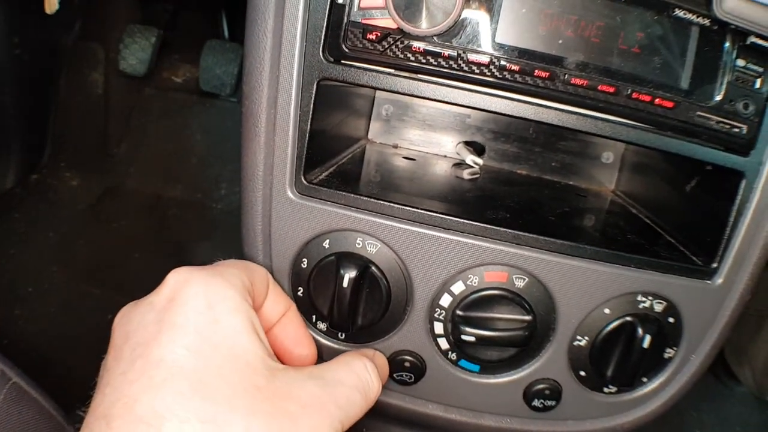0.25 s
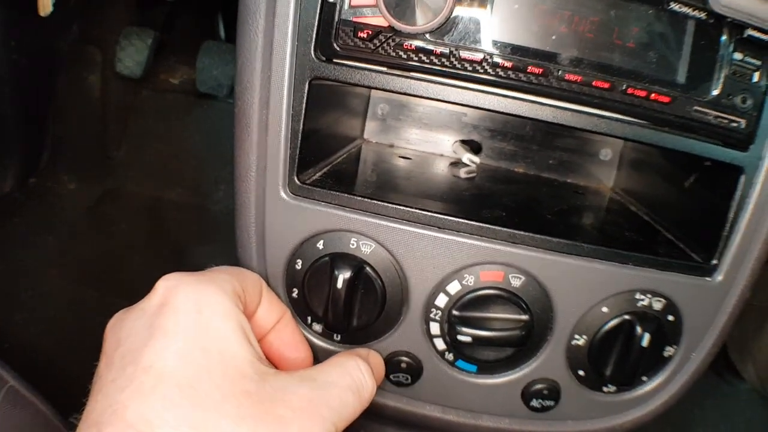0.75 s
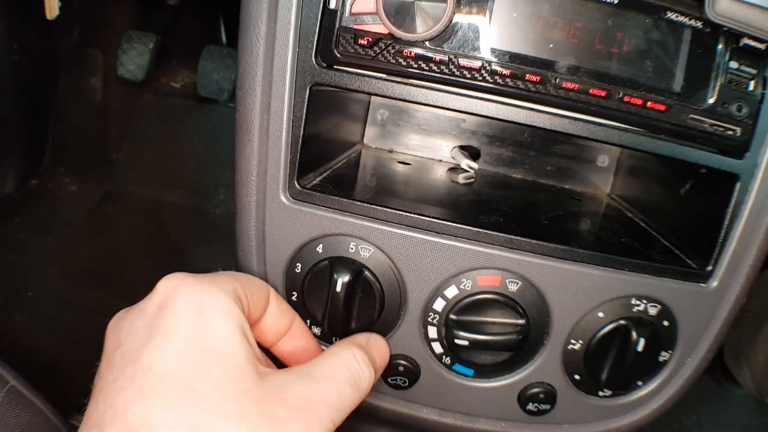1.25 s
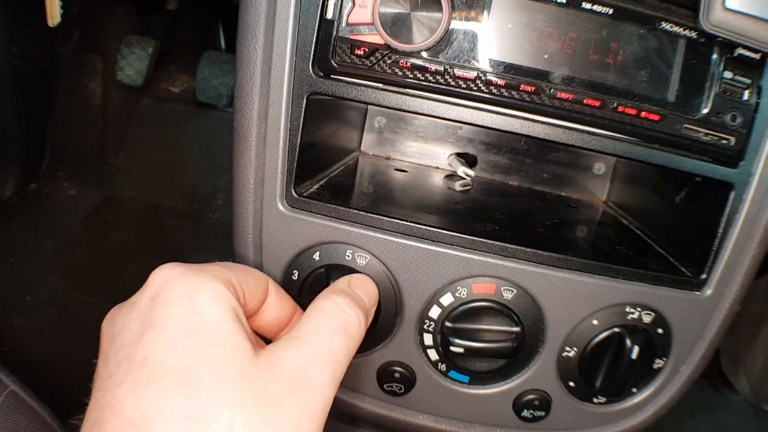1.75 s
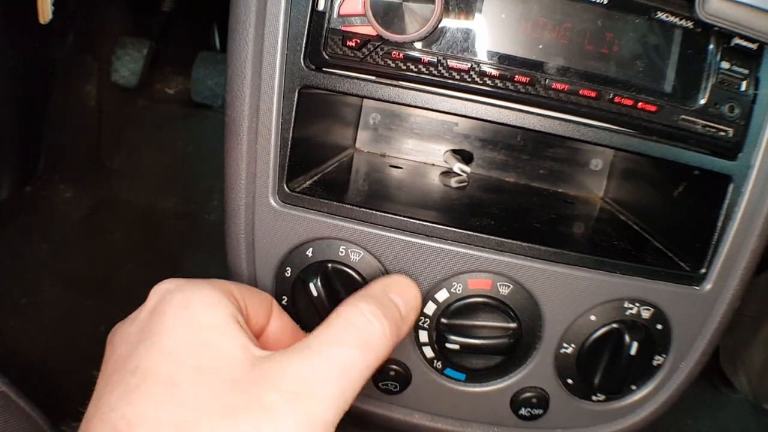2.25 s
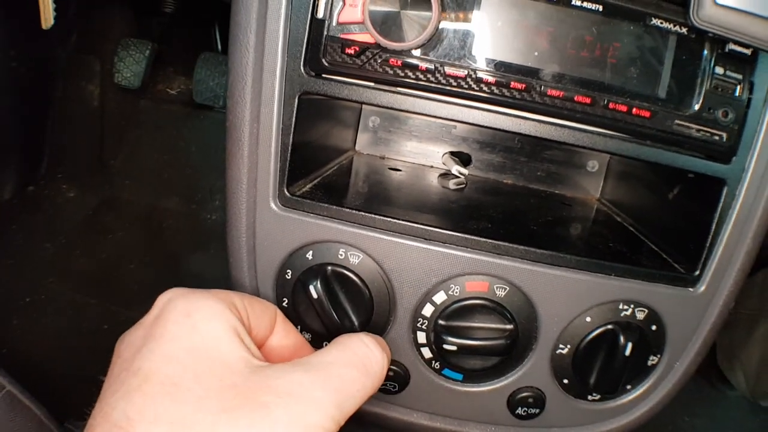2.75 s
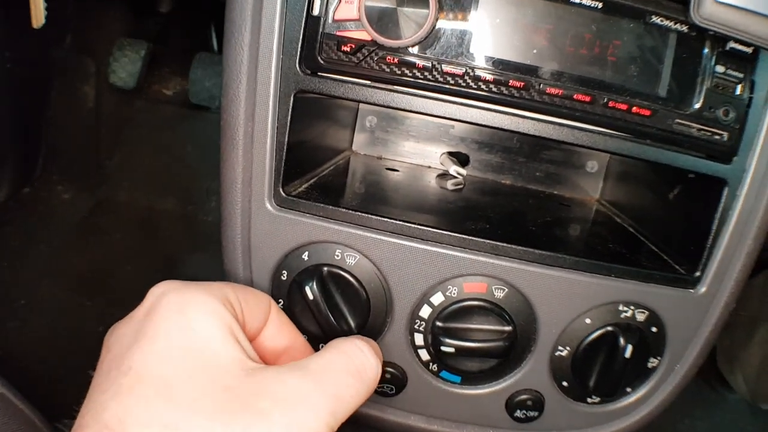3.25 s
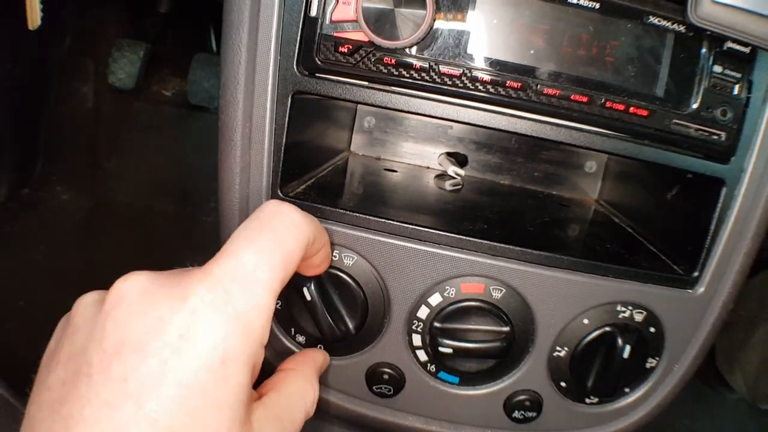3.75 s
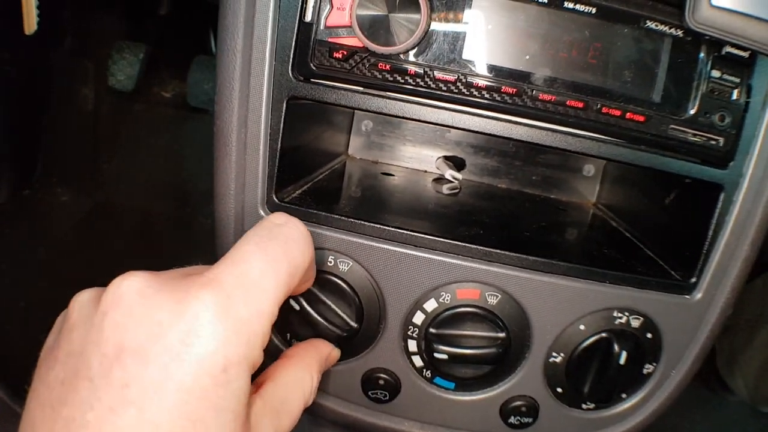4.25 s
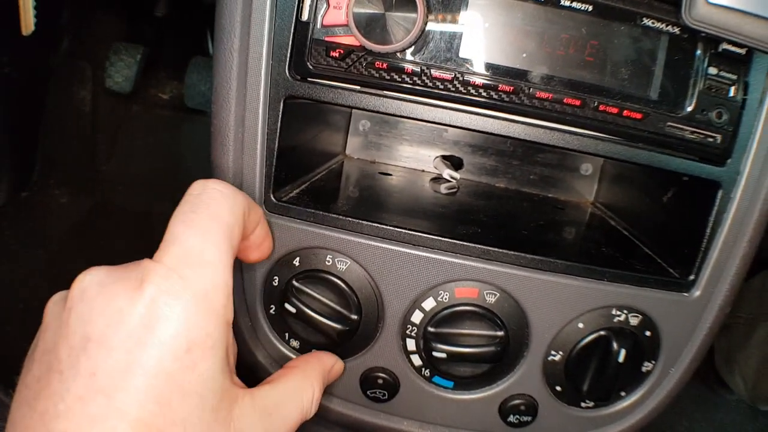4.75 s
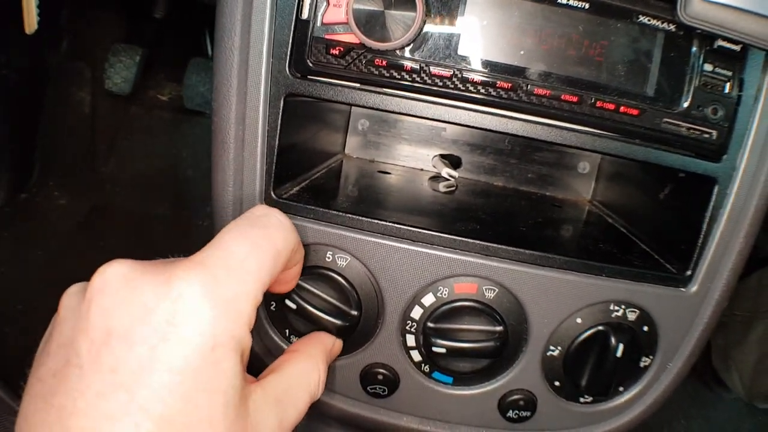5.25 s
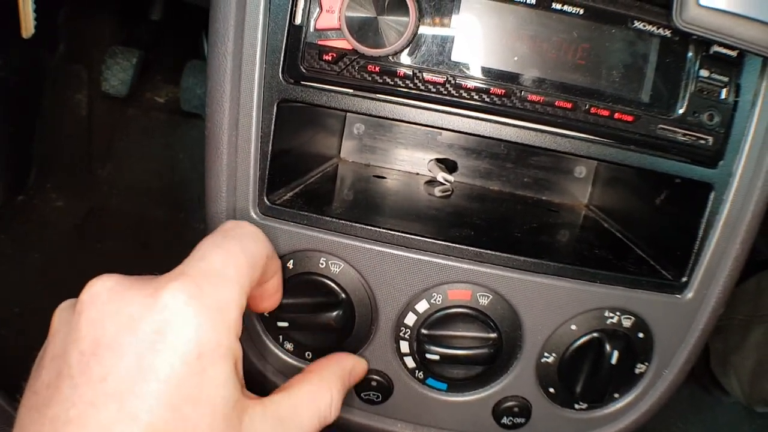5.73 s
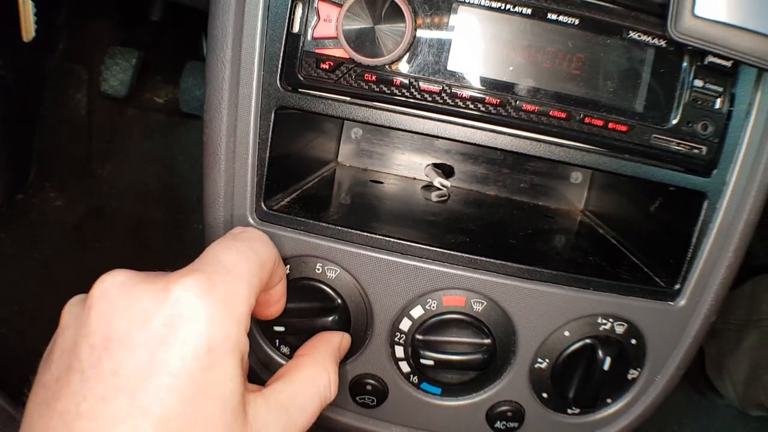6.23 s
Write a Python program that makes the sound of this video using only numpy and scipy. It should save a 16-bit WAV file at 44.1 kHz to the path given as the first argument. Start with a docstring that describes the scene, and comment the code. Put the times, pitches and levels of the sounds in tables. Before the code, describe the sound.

Inside a car, a close microphone sits in the jet of a blower at full speed: broad rushing air, low rumble and irregular wind puffs. After about two seconds a plastic knob clicks sharply, the wind collapses, and the fan's rush slides down and fades with a faint motor groan. In the quiet, fingers brush the knob; a softer click follows, then a loud, bright one.

```python
"""In a car's cabin, a microphone held by the dashboard stands in the jet of the blower at full speed.
Shaped noise makes the rushing air; random pressure swings and noise make the buffeting of the jet.
The fan knob clicks to off and the wheel coasts down, its whine vanishing and its motor groaning once.
In the quiet, fingers brush the knob as grainy noise, take a new grip and turn it two more detents:
bursts of noise for the plastic, decaying sines for the dashboard, over hiss, faint hum and low boom."""
import sys
import numpy as np
from scipy import signal
from scipy.fft import rfft, irfft
from scipy.io import wavfile
from scipy.ndimage import uniform_filter1d

SR = 44100
rng = np.random.default_rng(int(sys.argv[2]) if len(sys.argv) > 2 else 0)


def output_pcm(signal):
    """Save a mono or channel-first signal as 16-bit PCM at the path in sys.argv[1].

    Samples are clipped to [-1, 1] before scaling.
    """
    pcm = np.clip(np.atleast_2d(signal).T, -1, 1) * 32767
    wavfile.write(sys.argv[1], SR, np.round(pcm).astype(np.int16))


N = 286020

# In all tables half_s is the time from the centre to 1/e; left_right_db is left over right.
# Air rushing from the vents at full speed: pitch_hz, relative_db_per_hz
RUSH_COLOUR = [(40, -14.5), (150, -0.5), (400, -5), (650, -10), (950, -15.5), (1700, -20), (2600, -25.5),
               (4000, -30.5), (5200, -33.5), (7000, -38), (9000, -40), (12000, -38.5), (14000, -44),
               (16000, -51.5)]
# Fixed resonances of the ducts: pitch_hz, width_hz, lift_db, extra_lift_db_per_tenfold_slowing
DUCT_RESONANCES = [(460, 120, 8, 14), (660, 120, 7, 14), (1275, 120, 11, 13), (1400, 110, 7, 8),
                   (1950, 130, 4, 0), (2270, 160, 10, 0), (2930, 180, 6, 0), (3480, 300, 3, 0),
                   (4400, 130, 4, 0), (4820, 220, 6, 0), (5150, 130, 3, 0)]
# Balance of the rushing air: pitch_hz, left_right_db
VENT_BALANCE = [(200, 6), (450, -3), (900, -0.5), (1400, -1), (2300, 0.5), (5000, -0.5), (12000, 0)]
# Low rumble of the jet on the microphone: pitch_hz, relative_db_per_hz
RUMBLE_COLOUR = [(15, -18), (30, -12), (55, 2), (85, -1.5), (120, -1), (140, -1.5), (160, -7), (190, -14.5),
                 (240, -13), (400, -23), (1200, -74.5)]
# Sharp puffs on the microphone's ports: pitch_hz, relative_db_per_hz
PUFF_COLOUR = [(120, -18.5), (300, 3), (600, -8), (1000, -5), (1700, -12.5), (2500, -25), (4000, -32.5),
               (8000, -55)]
# The jet swings onto the microphone: centre_s, half_s, rumble_lift_db, small_eddy_lift_db
JET_GUSTS = [(0.01, 0.017, 9, 13.5), (0.172, 0.021, 5.5, -3), (0.777, 0.033, 5.5, 14.5),
             (1.465, 0.02, 2, 13.5), (1.618, 0.026, 8.5, 7.5), (1.731, 0.034, 15.5, 20),
             (1.872, .03, 9.5, 7.5), (1.981, 0.016, 7, 1), (2.095, .028, -2.5, 11), (2.193, 0.018, 3.5, -6)]
# Eddies that stand out, from low thuds to short, higher spits:
# centre_s, level_db, pitch_hz, half_s, left_right_db
STANDOUT_EDDIES = [(0.242, -16, 65, 0.0077, 1), (0.422, -17.5, 550, .0013, -13.5),
                   (0.533, -15, 190, 0.0022, 2), (0.758, -13.5, 700, 0.0017, -2),
                   (0.761, -9, 375, 0.0033, -3), (0.878, -7, 110, 0.0032, -1),
                   (1.134, -17.5, 83, 0.0078, 1), (1.451, -22.5, 696, 0.0011, -10),
                   (1.559, -20.5, 296, 0.0057, 3), (1.719, -14, 400, 0.0036, 6.5),
                   (1.725, -8.5, 134, 0.0062, -1), (1.766, -13, 76.5, 0.016, 2),
                   (1.988, -14.5, 282, 0.0042, 3.5), (2.077, -10.5, 300, 0.0026, -4.5),
                   (2.137, -27, 680, 0.0014, -19.5), (2.221, -27.5, 555, 0.0016, -20),
                   (2.281, -26, 596, 0.00093, -7), (2.425, -29.5, 144, 0.0061, -2)]
# Knob snaps over a detent, then seats: start_s, snap_level_db, seating_delay_s, seating_level_db,
# seating_brightness_hz, seating_push_db (push on the dashboard)
KNOB_DETENTS = [(2.0635, -8, 0.0026, -8, 13100, 4.5), (4.394, -15.5, 0.0071, -23, 2490, -5.5),
                (5.5214, -5.5, .0035, 1, 15000, -4)]
# Knob knocks lightly in its play: start_s, level_db, brightness_hz, push_db
KNOB_KNOCKS = [(3.843, -29, 9230, -38), (3.924, -34.5, 1500, -9.5), (4.499, -45.5, 704, 6),
               (5.3059, -32, 907, -1), (5.4863, -31, 9900, -5.5), (5.6092, -30, 9000, 11.5)]
# Colour of the plastic's snap: pitch_hz, relative_db_per_hz
SNAP_COLOUR = [(60, -27), (200, -12.5), (400, -0.5), (700, -14), (1500, -1), (2400, 0), (3700, -7),
               (5000, 1), (7500, -15), (9500, -3), (11200, 0), (13500, -5.5), (16000, -15)]
# Balance of the snap: pitch_hz, left_right_db
SNAP_BALANCE = [(500, -8), (2000, 0), (5000, -0.5), (9500, 1), (13000, 0)]
# The dashboard's ringing modes: pitch_hz, relative_level_db, t60_s
DASH_MODES = [(79.4, -27, 0.36), (137.7, -29.5, 0.36), (282.4, -31.5, 0.18), (540, -14, 0.1),
              (627, -25.5, 0.12), (842, -23, 0.068), (950, -26, 0.043), (1120, -27.5, .06),
              (1445, -34, 0.088), (1664, -29, 0.055), (1967, -27, 0.038), (2280, -47.5, 0.12),
              (3130, -32.5, 0.049)]
# The cabin's echo: pitch_hz, t60_s
CABIN_DECAY = [(100, .3), (600, 0.79), (2000, 0.31), (6000, 0.38), (14000, .12)]
# Fingers brushing and bumping the knob: start_s, level_db, centre_hz, width_octaves
FINGER_TOUCHES = [(3.524, -64.5, 1460, 1.7), (3.923, -55.5, 315, 0.4), (4.028, -69, 860, .8),
                  (4.202, -64.5, 1465, 5), (5.261, -67.5, 747, 0.81), (5.504, -51, 1510, 1.7),
                  (6.167, -66.5, 803, 1.4), (6.376, -60, 753, 1.9), (6.443, -57.5, 383, 0.33)]
# Background hiss: pitch_hz, relative_db_per_hz
HISS_COLOUR = [(100, -1.5), (200, -1), (400, 5), (550, -0.5), (1000, -4.5), (2500, -8.5), (4000, -6),
               (6000, -12), (7800, -20), (9500, -9.5), (12000, -0.5), (15700, -1.5)]
# Faint hum, before the background's swell: pitch_hz, level_db
HUM_TONES = [(274.3, -73), (343, -80.5), (411.5, -80), (823, -90.5)]
# The cabin's low boom: pitch_hz, relative_db_per_hz
CABIN_BOOM_COLOUR = [(15, -31.5), (26, -20.5), (36, -8.5), (50, -5.5), (70, 3.5), (100, -9.5), (160, -16.5),
                     (400, -46)]
# Slow swell of the background: time_s, gain_db
BACKGROUND_SWELL = [(0, -5.5), (3.15, -8), (3.4, -5.5), (4.1, -4.5), (4.7, -1.5), (6.49, 0)]
# The hand leans on the dashboard and the cabin booms: centre_s, level_db, half_s
HAND_LEANS = [(4.44, -52, 0.11), (4.87, -73, 0.047), (5.02, -61, 0.023), (5.307, -59.5, 0.027),
              (5.616, -45, 0.063), (6.45, -60, .04)]

OFF_S, COAST_S = 2.095, 0.79  # current is cut; time for the wheel's speed to fall to 1/e
WHINE_HZ, WHINE_DB = 2225, -53.5  # the blades' tone at full speed, before waver and flicker
GROAN_HZ, GROAN_DB = 666, -55  # motor's tone at full speed; its level at the housing's resonance
HOUSING_HZ, HOUSING_WIDTH_HZ = 221.6, 26
JET_HOLD_S, JET_LAW_DB = 0.138, 89  # jet outlasts the current; its fall per tenfold slowing
# Typical small fast eddy: rate, level, pitch, half length in cycles, left over right
SPITS_PER_S, SPIT_DB, SPIT_HZ, SPIT_CYCLES, SPIT_LEAN_DB = 10, -28, 897, 0.6, -5.5
RELEASE_HZ, RELEASE_PUSH_DB = 13000, -14  # brightness of the first snap; its push against the seating's
TOUCH_RISE_S = 0.011
HISS_DB, BOOM_DB = -64, -72.5  # before the background's swell
EDGE_HZ = 15830

TIME = np.arange(N) / SR
FRAME_S = np.arange(N // 256 + 5)[:, None] * 256 / SR
BIN_HZ = np.fft.rfftfreq(1024, 1 / SR)


def rush(level_db=-32.0, speed_law_db=42, stall_db=-85, patchy_db=4.0):
    """Turbulence slides down in pitch and level with the wheel, behind duct resonances that stay put."""
    a, b, c, d, patches = rng.standard_normal((5, len(FRAME_S), len(BIN_HZ)))
    likeness = [(200, .1), (1400, .1), (2400, 0.13), (5000, 0.12), (8000, 0.53), (12000, 1.0)]
    same = read(likeness, BIN_HZ)
    slowing = np.log10(speed(FRAME_S))
    field_db = read(RUSH_COLOUR, BIN_HZ / speed(FRAME_S))
    # the fall steepens as the flow in the ducts turns smooth
    field_db = field_db + speed_law_db * slowing + stall_db * slowing ** 2
    field_db = field_db + sum((lift - hold * slowing) / (1 + (2 * (BIN_HZ - hz) / width) ** 2)
                              for hz, width, lift, hold in DUCT_RESONANCES)
    patches = uniform_filter1d(patches, size=4, axis=0)
    patches = unit(uniform_filter1d(patches, size=16, axis=1))
    patches = patches / (1 + (BIN_HZ / 2500) ** 2)  # the high hiss is even
    gain = amp(field_db + patchy_db * patches) * pan(read(VENT_BALANCE, BIN_HZ))
    spectrum = pair(a + 1j * b, c + 1j * d, same) * gain
    air = signal.istft(spectrum.swapaxes(1, 2), nperseg=1024, noverlap=768)[1][:, :N]
    return amp(level_db) * air / air[:, TIME < OFF_S].std()


def speed(s):
    """Wheel speed as a share of full: friction slows it once the current is cut."""
    return np.exp(-np.maximum(s - OFF_S, 0) / COAST_S)


def buffeting(rumble_db=-31, rumble_lean_db=6.0, small_db=-39.5, small_lean_db=-1.0,
              per_cycle=0.26, spread_db=4.0, fall_db=-3,
              flutter_db=-42, flutter_lean_db=-5, burst_db=12.5,
              gust_share=0.4, small_law_db=110, wander_db=2):
    """The jet on the microphone: low rumble, a hail of small eddies and sharp puffs, moved by gusts."""
    strength_db = jet_db(TIME) + wander_db * wobble(size=1500)[0]
    surge_db = sum(lift * bump(s, half_s) for s, half_s, lift, _ in JET_GUSTS)
    gust_db = sum(lift * bump(s, half_s) for s, half_s, _, lift in JET_GUSTS)

    rumble = noise(RUMBLE_COLOUR, [(50, .15), (200, 0.15)])
    rumble = rumble * amp(rumble_db + strength_db + surge_db) * pan(rumble_lean_db)

    small = np.zeros((2, N))
    for hz in np.geomspace(165, 620, num=6):
        size = amp(spread_db * np.clip(rng.standard_normal((2, N)), -2, 2))
        size = size * rng.choice([-1, 1], (2, N))
        # smaller eddies come more often and push less
        hits = size * (rng.random((2, N)) < per_cycle * hz / SR)
        eddy = swirl(hz, 0.86 / hz, rng.uniform(0, 2 * np.pi))
        small += amp(fall_db * np.log2(hz)) * signal.oaconvolve(hits, eddy[None], "same")
    small = unit(small) * amp(small_db + strength_db + gust_db) * pan(small_lean_db)

    # turbulence is intermittent: puffs of a few milliseconds light up the whole midrange at once
    bursts = amp(burst_db * np.minimum(wobble(size=130), 2.4))
    puffs = unit(noise(PUFF_COLOUR, [(300, 0.12), (2000, 0.13)]) * bursts)
    puffs_db = flutter_db + gust_share * gust_db + small_law_db * np.log10(speed(TIME))
    return rumble + small + puffs * amp(puffs_db) * pan(flutter_lean_db)


def jet_db(s):
    """Strength of the jet: steady while the wheel runs, collapsing soon after it slows."""
    return JET_LAW_DB * np.log10(speed(s - JET_HOLD_S))


def swirl(hz, half_s, phase):
    """The pressure swing of one eddy passing a port, centred in a tenth of a second."""
    t = np.arange(-SR // 20, SR // 20) / SR
    return np.exp(-(t / half_s) ** 2) * np.cos(2 * np.pi * hz * t + phase)


def standout_eddies(port_lag=0.52, crackle_db=-12, crackle_s=0.0023):
    """Thuds and spits of air swing one port a little ahead of the other; high ones crackle the most."""
    out, breakup = np.zeros((2, 2, N))
    port_phase = port_lag * np.array([[-.5], [.5]])  # radians
    for s, db, hz, half_s, lean_db in STANDOUT_EDDIES + spits():
        gain = amp(db) * pan(lean_db)
        add(out, s - 1 / 20, gain * swirl(hz, half_s, port_phase))
        add(breakup, s - 1 / 20, gain * min(hz / 700, 1) * swirl(0, crackle_s, 0))
    return out + amp(crackle_db) * breakup * noise(PUFF_COLOUR, [(300, 0.64), (2000, .3)])


def spits(spread_db=4.0, octaves=0.33, count=40):
    """Small fast eddies at chance moments while the jet lasts, as rows like those of STANDOUT_EDDIES."""
    size, pitch, side = rng.standard_normal((count, 3)).T
    s = (np.arange(count) + rng.random(count)) / SPITS_PER_S
    hz = SPIT_HZ * 2 ** (octaves * pitch)
    level_db = SPIT_DB + spread_db * size
    lean_db = SPIT_LEAN_DB + spread_db * side
    rows = zip(s, level_db, hz, SPIT_CYCLES / hz, lean_db)
    return [row for row in rows if row[0] < OFF_S + JET_HOLD_S]


def wheel(waver=0.0018, flicker_db=3, rough=0.6):
    """The blades' whine dies as the wheel slows; the motor groans through the housing's resonance."""
    whine_hz = WHINE_HZ * speed(TIME) * (1 + waver * wobble(size=900))
    turns = np.cumsum(whine_hz, axis=1) / SR
    drive = speed(TIME) ** 10
    whine = drive * amp(WHINE_DB + flicker_db * wobble(size=1200)) * np.sin(2 * np.pi * turns)
    groan_hz = GROAN_HZ * speed(TIME)
    housing = 1 / (1 + (2 * (groan_hz - HOUSING_HZ) / HOUSING_WIDTH_HZ) ** 2)
    groan = amp(GROAN_DB) * housing * np.sin(2 * np.pi * np.cumsum(groan_hz) / SR)
    return whine + groan * (1 + rough * wobble(size=300))


def knob(snap_db=-9, snap_t60=0.0085, rattle_db=-11, rattle_t60=0.062, cabin_db=-33,
         dash_db=-4, build_cycles=0.96, attack_s=0.0004, push_hz=900):
    """Each blow is a snap of plastic, a short rattle and the cabin's echo; its push rings the dashboard."""
    t = np.arange(SR // 2) / SR
    hz = np.fft.rfftfreq(len(t), 1 / SR)
    same = read([(300, -0.81), (1500, -0.14), (5000, -0.34), (8000, 0.65), (12000, 0.82)], hz)
    snap_gain = amp(read(SNAP_COLOUR, hz)) * pan(read(SNAP_BALANCE, hz))[:, 0]
    decay = amp(-60 * t / snap_t60) + amp(rattle_db - 60 * t / rattle_t60)
    phases = rng.normal(0, 0.66, (len(DASH_MODES), 2, 1))
    modes = []
    for (f, db, t60), phase in zip(DASH_MODES, phases):
        # a mode takes a few cycles to build up, so the bass blooms late
        build = (1 - np.exp(-t * f / build_cycles)) ** 2
        modes.append(amp(db - 60 * t / t60) * build * np.sin(2 * np.pi * f * t + phase))
    out = np.zeros((2, N))
    for s, db, bright_hz, push_db in blows():
        direct, echo = rng.standard_normal((2, 2, len(t)))
        f, frame_s, z = signal.stft(echo, SR, nperseg=256)
        echo_gain = amp(cabin_db - 60 * frame_s / read(CABIN_DECAY, f)[:, None])
        echo = signal.istft(z * echo_gain, SR, nperseg=256)[1][:, :len(t)]
        burst = (direct * decay + echo) * (1 - np.exp(-t / attack_s))
        snap = irfft(pair(*rfft(burst), same) * snap_gain, len(t))
        snap = snap * (t < t[-1] / 2)
        # a slow push feeds only the low modes
        ring = sum(amp(push_db / (1 + (row[0] / push_hz) ** 4)) * mode
                   for row, mode in zip(DASH_MODES, modes))
        blow = amp(snap_db) * snap + amp(dash_db) * ring
        # a lower brightness takes off more treble
        treble_cut = signal.butter(2, min(bright_hz, SR * .45), fs=SR)
        add(out, s, amp(db) * signal.lfilter(*treble_cut, blow))
    return out


def blows():
    """Two blows per detent, one per knock, as rows of start_s, level_db, brightness_hz, push_db."""
    releases = [(s, db, RELEASE_HZ, push_db + RELEASE_PUSH_DB)
                for s, db, _, _, _, push_db in KNOB_DETENTS]
    seatings = [(s + delay_s, db, hz, push_db) for s, _, delay_s, db, hz, push_db in KNOB_DETENTS]
    return releases + seatings + KNOB_KNOCKS


def touches(grain_db=2.0, fade=0.67):
    """Skin sticks and slips on plastic: a grainy scuff that swells and fades."""
    t = np.arange(SR // 2) / SR
    hz = np.fft.rfftfreq(len(t), 1 / SR) + 1
    stroke = (t / TOUCH_RISE_S * np.exp(1 - t / TOUCH_RISE_S)) ** fade
    out = np.zeros((2, N))
    for s, db, centre_hz, octaves in FINGER_TOUCHES:
        a, b, grain = rng.standard_normal((3, len(t)))
        slips = pair(a, b, 0.44) * amp(grain_db * unit(uniform_filter1d(grain, size=80)))
        colour = (1 + (np.log2(hz / centre_hz) / octaves) ** 2 / 2) ** -1.5 / np.sqrt(hz)
        scuff = unit(irfft(rfft(slips) * colour, len(t)))
        add(out, s, amp(db) * stroke * scuff)
    return out


def background():
    """Hiss, faint hum and low boom creep up in the quiet; the boom swells under the leaning hand."""
    likeness = [(300, 0.64), (1500, 0.093), (4500, 0.069), (9000, .9), (12000, 0.97)]
    hiss = amp(HISS_DB) * noise(HISS_COLOUR, likeness)
    hum = sum(amp(db) * np.sqrt(2) * np.sin(2 * np.pi * (hz * TIME + rng.random()))
              for hz, db in HUM_TONES)
    boom = noise(CABIN_BOOM_COLOUR, [(60, 1.0), (300, 0.31)])
    leaning = sum(amp(db) * bump(s, half_s) for s, db, half_s in HAND_LEANS)
    return (hiss + hum + amp(BOOM_DB) * boom) * amp(curve(BACKGROUND_SWELL)) + leaning * boom


def noise(colour, likeness):
    """Steady stereo noise of rms 1 with a spectrum and a left-right likeness by frequency."""
    hz = np.fft.rfftfreq(N, 1 / SR)
    spectrum = pair(*rfft(rng.standard_normal((2, N))), read(likeness, hz))
    return unit(irfft(spectrum * amp(read(colour, hz)), N))


def wobble(size):
    """A smooth random curve of rms 1 for each channel, changing over size samples."""
    return unit(signal.oaconvolve(rng.standard_normal((2, N)), np.hanning(2 * size)[None], "same"))


def bump(s, half_s):
    """A smooth rise to 1 at time s and back."""
    return np.exp(-((TIME - s) / half_s) ** 2)


def pair(a, b, same):
    """Two channels of given likeness from two unrelated signals."""
    angle = np.arccos(np.clip(same, -1, 1)) / 2
    return np.array([np.cos(angle) * a + np.sin(angle) * b, np.cos(angle) * a - np.sin(angle) * b])


def pan(db):
    """Left and right gains for a level difference."""
    return amp(np.array([[db], [-db]]) / 2)


def add(mix, s, sound):
    """Mixes a stereo sound in at time s."""
    part = mix[:, max(round(s * SR), 0):][:, :sound.shape[1]]
    part += sound[:, :part.shape[1]]


def read(points, hz):
    """Reads a table by frequency on a log-frequency axis."""
    f, value = np.transpose(points)
    return np.interp(np.log(hz + 1), np.log(f + 1), value)


def curve(rows):
    """A control curve at every sample."""
    return np.interp(TIME, *np.transpose(rows))


def amp(db):
    """Decibels to gain."""
    return 10 ** (np.asarray(db) / 20)


def unit(x):
    """Scales to rms 1."""
    return x / np.sqrt(np.mean(x ** 2) + 1e-20)


def scene():
    """Blower, wind on the microphone, knob, fingers and cabin."""
    blower = rush() + wheel()
    wind = buffeting() + standout_eddies()
    hand = knob() + touches()
    return blower + wind + hand + background()


def record(dry):
    """The recorder's band limit: a steep low-pass."""
    low_pass = signal.firwin(511, EDGE_HZ, window=("kaiser", 9), fs=SR)
    return signal.oaconvolve(dry, low_pass[None], "same")


dry = scene()
out = record(dry)
output_pcm(out)
```